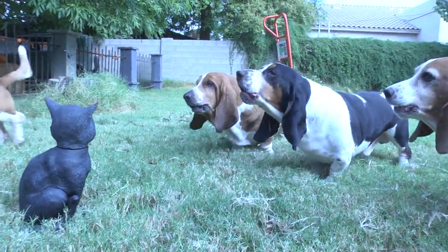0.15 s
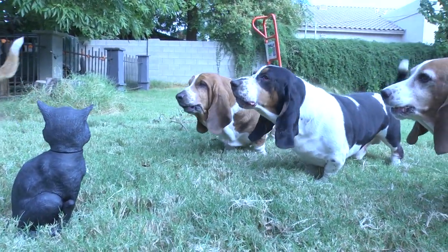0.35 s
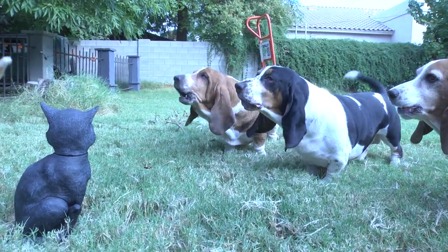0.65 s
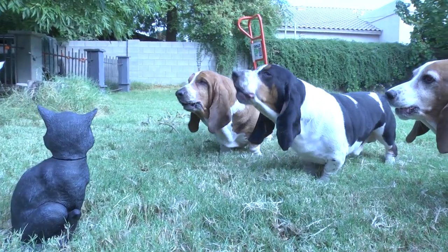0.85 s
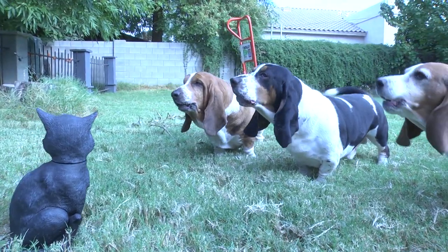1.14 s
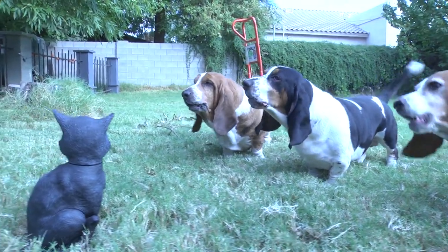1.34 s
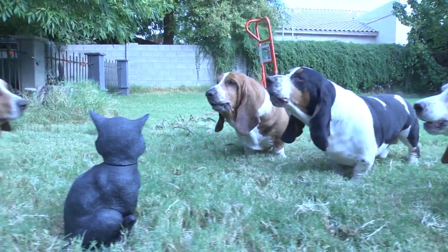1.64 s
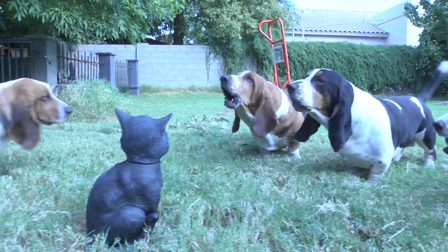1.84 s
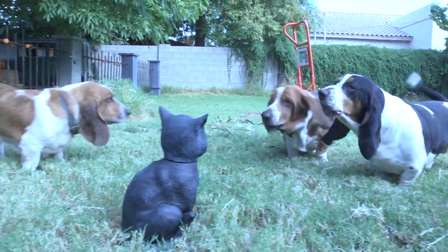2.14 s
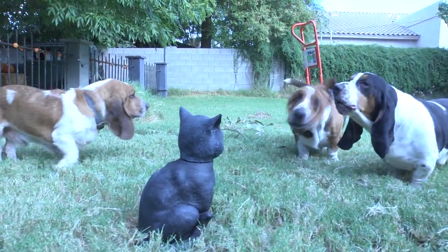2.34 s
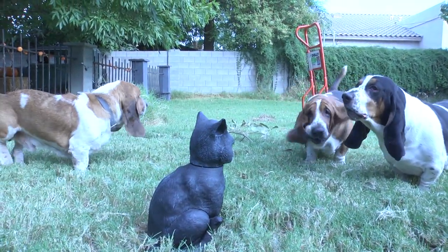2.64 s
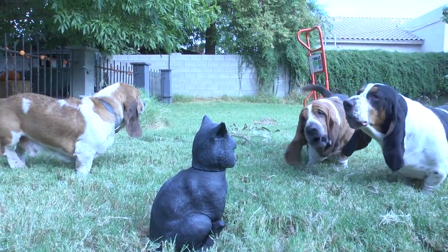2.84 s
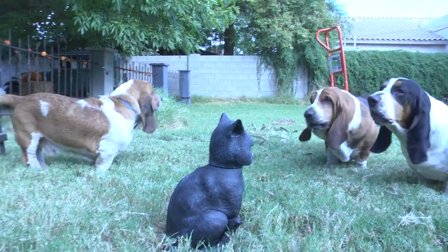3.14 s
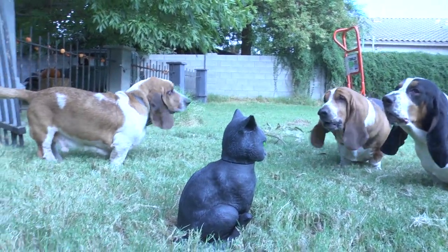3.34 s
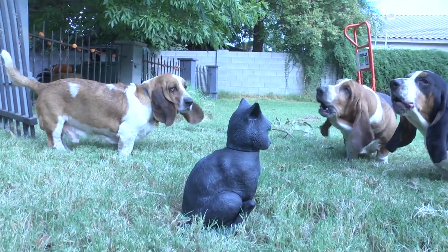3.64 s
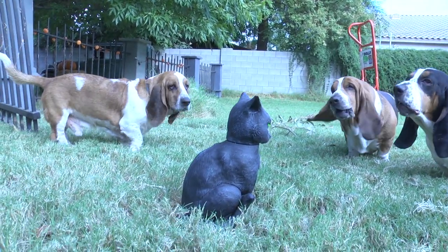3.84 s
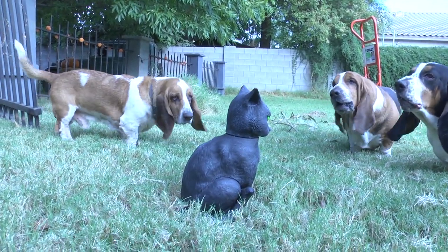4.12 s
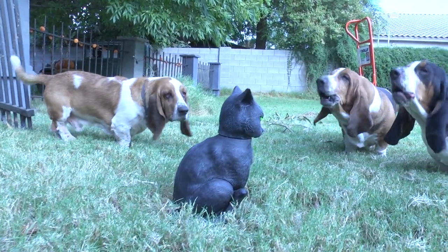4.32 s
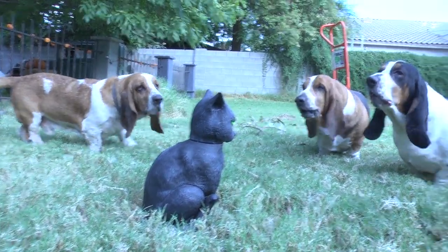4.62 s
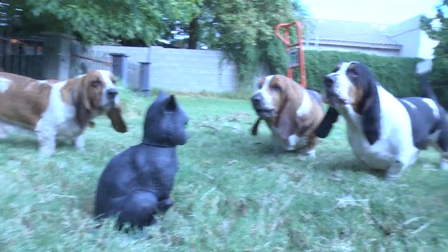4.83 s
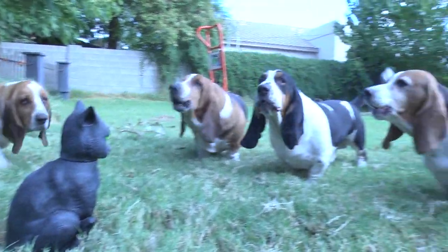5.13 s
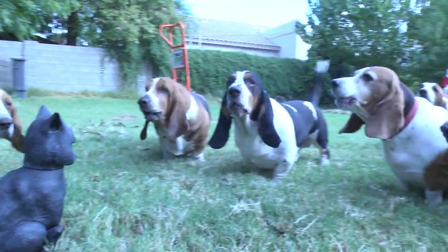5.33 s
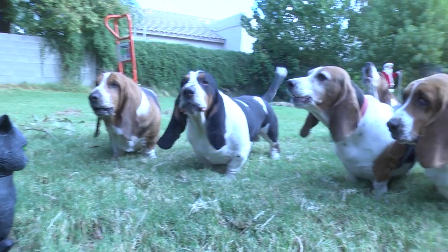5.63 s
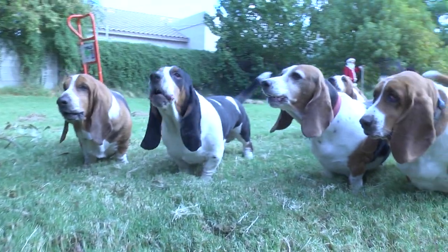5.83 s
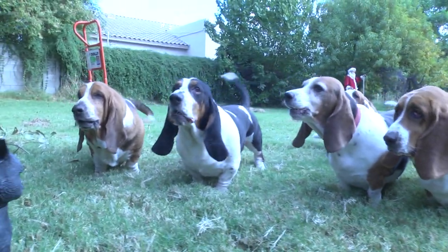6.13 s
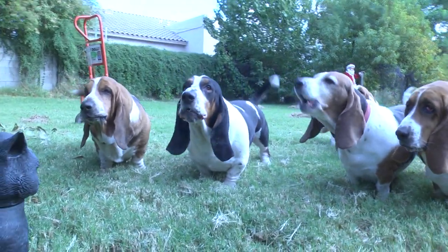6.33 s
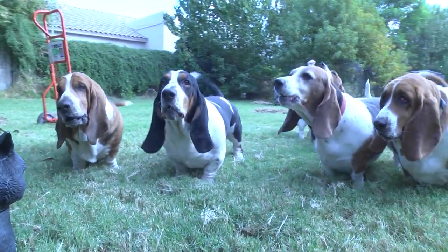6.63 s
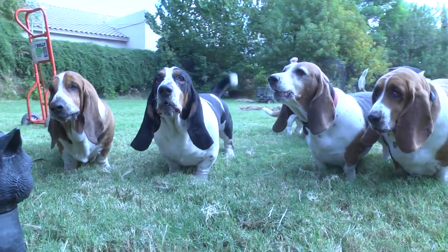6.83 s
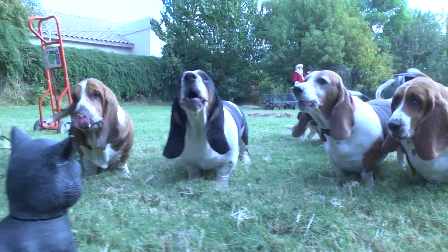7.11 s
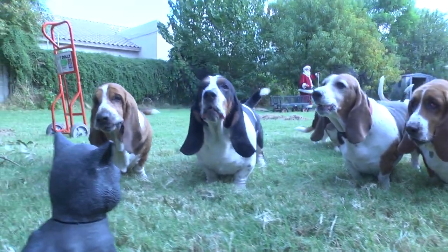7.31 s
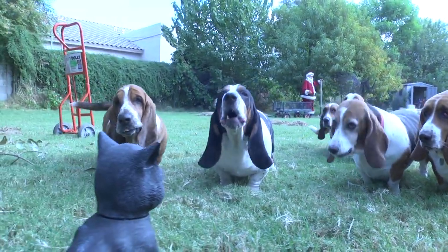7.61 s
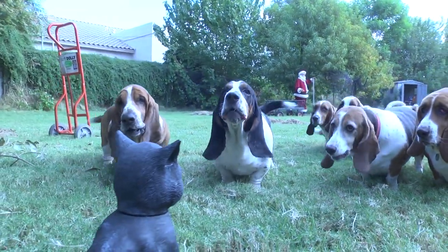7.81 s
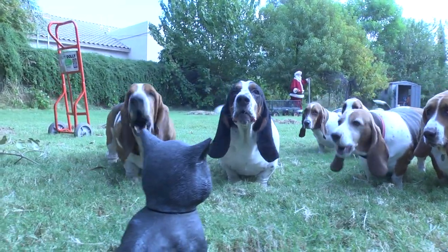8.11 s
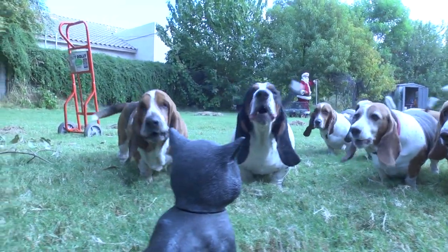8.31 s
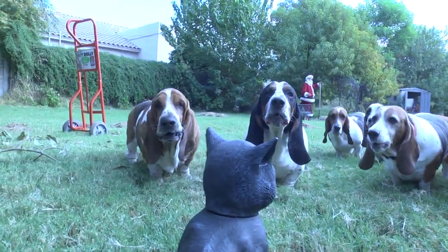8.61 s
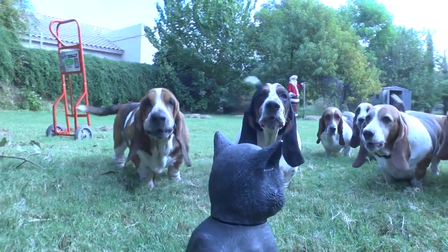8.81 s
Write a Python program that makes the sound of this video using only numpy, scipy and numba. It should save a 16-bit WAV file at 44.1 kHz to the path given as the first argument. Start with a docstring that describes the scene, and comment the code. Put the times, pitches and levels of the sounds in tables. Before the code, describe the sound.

Four basset hounds stand close to the microphone on a lawn, barking and baying without a real pause. A deep woof starts it, a ringing bay and a longer hoarse nasal bay follow, then a harsh rasping bark joins. Calls come three or four per second, often overlapping, each cracking and dropping abruptly. Tiny whines and low growls hide between them; faint outdoor air and light echo lie beneath.

```python
"""A deep woof, then a ringing bay and a hoarse bay: four basset hounds call over one another on a lawn.
A harsh bark joins in; thin whines, low growls and bursts of noise slip in between, over faint outdoor air.
Barks and bays are arches of pitch: harmonics of the vocal folds crack into half-tones and rasp, then sink
to a grunt. Each dog has its own throat filter and moving mouth resonance; walls and hedges echo faintly."""
import sys
import numpy as np
from scipy import signal
from scipy.fft import rfft, irfft
from scipy.io import wavfile
from scipy.ndimage import uniform_filter1d, map_coordinates
from numba import njit

SR = 44100
rng = np.random.default_rng(int(sys.argv[2]) if len(sys.argv) > 2 else 0)


def bounce(signal):
    """Save signal as a 16-bit WAV file at the path given by the first command-line argument."""
    frames = np.transpose(np.atleast_2d(signal))
    limited = np.clip(frames, -1, 1)
    pcm = np.round(limited * 32767).astype(np.int16)
    wavfile.write(sys.argv[1], SR, pcm)


N = 395136
TOP_HZ = 15500  # limit of fold harmonics and of the final low-pass

# Calls, clear ringing bay: [full voice t/s, attack/s, hold/s, tail/s, top target f/Hz, settled target f/Hz,
# level/dB, treble offset/dB, roughness/1, crack delay/s, crack roughness/1]; roughness is clipped to 0-1
CLEAR_CALLS = [ (0.132, 0.045, 0.16, 0.17, 513, 507.4, -12.5, 0, 0.16, 0.14, 0.88),
               (0.865, 0.045, .15, 0.058, 499.6, 502.4, -13, 0.5, 0.12, 0.12, 1.1),
               (2.257, 0.041, 0.16, .16, 506, 510, -13, 1.5, 0.16, .11, 1.11),
               (2.92, 0.058, 0.15, 0.059, 504.7, 512.6, -12, 0, 0.2, 0.11, 1.11),
               (3.195, 0.044, 0.065, 0.037, 381.6, 350, -26.5, 0, 0.15, .05, 0.23),
               (4.36, 0.064, .14, 0.068, 495.3, 527, -16.5, 3.5, 0.2, 0.099, 0.9),
               (5.768, .06, .146, .08, 511.7, 547, -13.5, 0, 0.36, 0.13, 0.82),
               (7.075, 0.066, 0.15, .09, 506, 547.6, -12, 1, 0.18, 0.11, .85),
               (7.66, 0.041, 0.16, 0.18, 505.2, 524.7, -12.5, 0.5, 0.23, 0.12, 1.06),
               (8.342, 0.049, 0.14, 0.13, 502, 526, -13, 2, 0.13, 0.13, 0.71), ]
# Its throat and muzzle response: [f/Hz, level/dB]
CLEAR_THROAT = [(120, 9), (500, 4.5), (780, 2.5), (1050, -7), (1550, -13.5), (2050, -19), (2700, -34.5),
                (3250, -26), (4100, -59.5), (5200, -35.5), (6100, -37.5), (7000, -49), (15000, -69.5)]


def clear_bay():
    """Ringing bay: steady folds, low rasp, strong half-tones in the crack."""
    arch_habit = dict(swoop_s=0.016, top_s=0.04, settle_s=0.08, drop_after_s=0.0069, drop_s=0.013)
    push_habit = dict(droop_db_per_s=17.5, release_db_per_s=450.5, grunt_db=-30.5)
    calls = barks(CLEAR_CALLS, arch_habit, crack_s=0.031, **push_habit)
    return voice_all(calls, CLEAR_THROAT, jitter=0.014, jitter_rate_hz=200, halftone_gain=1.1,
                     rasp_gain_db=-2.5, hoarse=0, closing_treble_db=-1.0,
                     mouth_hz=(770, 1500), mouth_gain_db=3)


# Calls, long hoarse nasal bay: [columns as CLEAR_CALLS]
HOARSE_CALLS = [ (0.345, 0.051, 0.14, 0.2, 500, 364.7, -14, -0.5, 0.43, 0.16, 0.95),
                (0.745, .055, .13, .12, 485, 365, -15, 1.5, 0.39, 0.12, 0.7),
                (1.715, 0.052, 0.093, 0.11, 498.5, 391, -13, 0.47, 0.38, 0.099, 0.66),
                (2.735, 0.051, 0.093, 0.12, 503.5, 373, -13, -2.5, 0.26, 0.092, 0.63),
                (3.848, .045, 0.14, .12, 510.3, 378, -13.5, -0.53, 0.31, 0.015, 0.56),
                (4.74, 0.059, 0.12, .15, 502.6, 365.4, -16, 1.7, 0.24, .14, 0.72),
                (5.615, 0.055, .15, .05, 533.5, 401.3, -13, 1.3, .6, 0.16, 0.77),
                (6.603, 0.058, 0.13, .15, 515, 388.3, -12.5, 0.29, 0.38, 0.17, 0.87),
                (7.445, 0.066, 0.12, 0.15, 510.5, 410.6, -12, 1.4, 0.32, 0.15, 0.74), ]
# Its throat and muzzle response: [f/Hz, level/dB]
HOARSE_THROAT = [(120, -8), (480, 0), (620, -8.5), (880, -3.5), (1220, -24), (1700, -15.5), (2150, -31.5),
                 (2600, -29.5), (2950, -40.5), (4500, -60), (6300, -39), (6900, -58), (8500, -53.5),
                 (12000, -81.5)]


def hoarse_bay():
    """Hoarse bay: turbulence replaces part of the upper harmonics; pitch drops late and slowly."""
    arch_habit = dict(swoop_s=0.017, top_s=0.055, settle_s=0.087, drop_after_s=0.19, drop_s=0.035)
    push_habit = dict(droop_db_per_s=19.5, release_db_per_s=134.5, grunt_db=-45)
    calls = barks(HOARSE_CALLS, arch_habit, crack_s=0.045, **push_habit)
    return voice_all(calls, HOARSE_THROAT, jitter=0.045, jitter_rate_hz=260, halftone_gain=0.23,
                     rasp_gain_db=1.0, hoarse=0.39, closing_treble_db=-1,
                     mouth_hz=(1560, 1700), mouth_gain_db=3)


# Calls, deep woof: [columns as CLEAR_CALLS]
WOOF_CALLS = [ (0.0, .02, 0.077, 0.058, 397.8, 383, -12, -2, 0.13, 0.0036, 0.98),
              (0.622, .018, 0.12, 0.075, 426.7, 379, -13, 2, 0.099, 0.038, 0.73),
              (1.55, 0.045, 0.14, 0.035, 449.5, 418.3, -11.5, 2, 0.33, 0.094, 0.91),
              (1.85, 0.038, .13, 0.068, 421.5, 386, -14, 4, 0.14, 0.024, 0.66),
              (3.612, 0.057, 0.15, .05, 456.4, 386.4, -12, 2, 0.29, 0.054, 0.61),
              (4.295, 0.044, .115, 0.083, 420.2, 398, -13, 5.5, 0.091, .005, 0.75),
              (5.072, 0.021, .143, 0.035, 426, 375, -12, 1, 0.13, 0.046, 0.99),
              (8.727, 0.057, 0.13, 0.12, 437.6, 392, -12.5, 2, 0.14, 0.028, .8), ]
# Its throat and muzzle response: [f/Hz, level/dB]
WOOF_THROAT = [(120, 2), (400, 4), (820, -3.5), (1050, -8.5), (1700, -23.5), (2200, -25), (2700, -39),
               (3200, -33.5), (4300, -49.5), (6200, -44), (7500, -57), (15000, -72.5)]


def deep_woof():
    """Deep woof: lower pitch arch and early crack through a dark throat."""
    arch_habit = dict(swoop_s=0.014, top_s=0.035, settle_s=0.055, drop_after_s=0.03, drop_s=0.011)
    push_habit = dict(droop_db_per_s=13.5, release_db_per_s=477.5, grunt_db=-33)
    calls = barks(WOOF_CALLS, arch_habit, crack_s=0.035, **push_habit)
    return voice_all(calls, WOOF_THROAT, jitter=0.04, jitter_rate_hz=260, halftone_gain=0.25,
                     rasp_gain_db=0.5, hoarse=0, closing_treble_db=-2.0,
                     mouth_hz=(810, 1350), mouth_gain_db=-3)


# Calls, short harsh bark: [columns as CLEAR_CALLS]
HARSH_CALLS = [ (1.072, 0.029, 0.13, 0.047, 561.8, 417.6, -12, -0.31, 0.44, 0.019, 0.94),
               (2.066, 0.034, 0.12, 0.095, 482.3, 409.3, -12.5, -0.21, 0.44, 0.037, 0.65),
               (2.589, 0.027, 0.14, 0.035, 546.7, 417.5, -12, -1, 0.27, .025, 0.99),
               (4.12, 0.042, 0.15, .04, 511.7, 472, -12, 0.59, 0.56, 0.057, 1),
               (4.637, 0.031, 0.14, 0.058, 492.2, 419, -12, 0.68, 0.47, 0.028, 0.9),
               (5.235, 0.037, .105, 0.073, 528.6, 495.3, -13, -1.9, 0.61, 0.083, 0.807),
               (6.352, 0.024, 0.14, 0.054, 573, 452, -11, -0.41, .45, .075, 1),
               (8.122, .028, .16, 0.041, 519.4, 411.6, -11, 0.31, 0.14, 0.038, 0.56), ]
# Its throat and muzzle response: [f/Hz, level/dB]
HARSH_THROAT = [(120, 2), (450, 3), (760, 1.5), (1250, -14), (1550, -14), (2050, -28), (2450, -25),
                (3300, -35.5), (4300, -52.5), (6250, -37), (7500, -58), (15000, -67.5)]


def harsh_bark():
    """Harsh bark: fast pitch swoop, heavy jitter and rasp."""
    arch_habit = dict(swoop_s=0.009, top_s=0.022, settle_s=0.04, drop_after_s=0.031, drop_s=0.014)
    push_habit = dict(droop_db_per_s=22, release_db_per_s=498.5, grunt_db=-36)
    calls = barks(HARSH_CALLS, arch_habit, crack_s=0.04, **push_habit)
    return voice_all(calls, HARSH_THROAT, jitter=0.098, jitter_rate_hz=190, halftone_gain=0.49,
                     rasp_gain_db=0.5, hoarse=0.23, closing_treble_db=-2.5,
                     mouth_hz=(760, 1100), mouth_gain_db=-8)


# Thin whines: [start t/s, length/s, first f/Hz, last f/Hz, mid level/dB, treble offset/dB, roughness/1]
WHINE_CALLS = [(3.17, 0.23, 330.6, 368.7, -37.5, 7, 0.13), (3.385, .25, 423, 582, -38, 9, 0.45),
               (7.23, 0.37, 640, 721, -38.5, -12, 0.2)]
# Whine throat response: [f/Hz, level/dB]
WHINE_THROAT = [(350, -18.5), (680, 1.5), (1550, 9), (2300, -16.5), (3200, -36.5), (9000, -48.5)]


def whines():
    """Thin rising glides of the folds with little jitter and no added half-tones."""
    return voice_all(glides(WHINE_CALLS), WHINE_THROAT, jitter=0.013, jitter_rate_hz=59, halftone_gain=0,
                     rasp_gain_db=5.0, hoarse=0, closing_treble_db=3.0,
                     mouth_hz=(1100, 1500), mouth_gain_db=-27)


# Low growls: [columns as WHINE_CALLS]
GROWL_CALLS = [(1.38, 0.14, 70.4, 64.8, -44.5, 2, 1), (3.1, 0.11, 60, 57.9, -33, 5, 0.36),
               (3.42, 0.28, 68.7, 80.8, -42.5, -8, 0.28), (4.98, .1, 160, 123.6, -29, -2.5, 0.55),
               (8.635, 0.11, 61.4, 70.3, -33.5, 3, .4)]
# Throat response behind a closed jaw: [f/Hz, level/dB]
GROWL_THROAT = [(60, -5), (150, 9.5), (400, 1), (900, -22), (2000, -30), (8000, -57)]


def growls():
    """Low, uneven fold pulses through a throat that passes mostly bass."""
    return voice_all(glides(GROWL_CALLS), GROWL_THROAT, jitter=0.093, jitter_rate_hz=170, halftone_gain=0.3,
                     rasp_gain_db=-7, hoarse=0, closing_treble_db=-4,
                     mouth_hz=(700, 900), mouth_gain_db=-19.5)


# Noise bursts at the hardest push of a bark: [t/s, level/dB]
GUST_TIMES = [(0.647, -26), (5.077, -28), (6.376, -26), (8.139, -24), (8.731, -22)]
# Burst spectrum: [f/Hz, level/dB]
GUST_COLOUR = [(30, -10), (150, 9.5), (1000, 1), (2300, -6.5), (4500, -29.5), (6200, -34), (15000, -73)]


def gusts(width_s=0.021):
    """Voice breaks up briefly: broad noise under Gaussian pulses."""
    t = np.arange(N) / SR
    pulses = sum(undb(db) * np.exp(-0.5 * ((t - peak_s) / width_s) ** 2) for peak_s, db in GUST_TIMES)
    noise = rng.standard_normal(N) * undb(4.8 * wobble(N, 300))
    return pulses * unit(colour(noise, GUST_COLOUR))


def voice_all(calls, throat, **voice):
    """Sum all calls made with one voice setting."""
    return sum(call(*controls, throat, **voice) for controls in calls)


def barks(rows, arch_habit, crack_s, **push_habit):
    """Yield t, f, level, treble, roughness per bark or bay; each call has one Gaussian crack in the voice."""
    slack_rough = 0.45  # slack folds flap unevenly below the settled pitch
    for (start_s, attack_s, hold_s, tail_s, top_hz, settled_hz,
         db, treble_db, rough, crack_delay_s, cracked) in rows:
        t = span(start_s - attack_s, start_s + hold_s + tail_s)
        age_s = t - start_s
        hz = arch(age_s, hold_s, top_hz, settled_hz, **arch_habit)
        level_db = push(age_s, attack_s, hold_s, db, **push_habit)
        crack = np.exp(-((age_s - crack_delay_s) / crack_s) ** 2)
        flap = slack_rough * np.maximum(1 - hz / settled_hz, 0)
        yield t, hz, level_db, treble_db, rough + crack * (cracked - rough) + flap


def arch(age_s, hold_s, top_hz, settled_hz, swoop_s, top_s, settle_s, drop_after_s, drop_s):
    """Pitch/Hz: folds tighten from a grunt to the top, settle, go slack again."""
    grunt_hz, grunt_sag_s, swoop_lead_s = 160.27, 0.3, 0.011
    settling = np.exp(-(np.maximum(age_s - top_s, 0) / settle_s) ** 2)
    tight_hz = settled_hz + (top_hz - settled_hz) * settling
    slack_hz = grunt_hz * np.exp(-np.maximum(age_s - hold_s, 0) / grunt_sag_s)
    swoop = ramp((age_s + swoop_lead_s) / swoop_s)
    drop = ramp((hold_s + drop_after_s - age_s) / drop_s)
    return slack_hz + swoop * drop * (tight_hz - slack_hz)


def push(age_s, attack_s, hold_s, db, droop_db_per_s, release_db_per_s, grunt_db):
    """Level/dB: attack, drooping hold, release onto a fading grunt."""
    attack_db, grunt_fade_db_per_s = 31, 66.5
    over_s = np.maximum(age_s - hold_s, 0)
    level_db = db + attack_db * np.minimum(age_s / attack_s, 0)
    level_db = level_db - droop_db_per_s * np.clip(age_s, 0, hold_s)
    level_db = level_db - release_db_per_s * over_s
    grunt_level_db = grunt_db - grunt_fade_db_per_s * over_s
    return np.where(over_s > 0, np.maximum(level_db, grunt_level_db), level_db)


def glides(rows):
    """Yield the same controls per whine or growl: a slowing glide, loudest in the middle."""
    swell_db = 5.5
    for start_s, length_s, first_hz, last_hz, db, treble_db, rough in rows:
        t = span(start_s, start_s + length_s)
        part = np.linspace(0, 1, len(t))
        hz = last_hz + (first_hz - last_hz) * (1 - part) ** 2
        yield t, hz, db - swell_db * (2 * part - 1) ** 2, treble_db, rough


# Turbulence spectrum at the folds: [f/Hz, level/dB]
RASP_COLOUR = [(40, -32), (180, -15), (290, -23.5), (480, -1.5), (740, 2.5), (12000, 2.5)]
# Dogs come round to face the microphone and brighten: [t/s, treble offset/dB]
FACING = [(4, -2.5), (8, 0)]


def call(t, hz, db, treble_db, rough, throat, jitter, jitter_rate_hz, halftone_gain, rasp_gain_db, hoarse,
         closing_treble_db, mouth_hz, mouth_gain_db):
    """One call: fold harmonics, half-tones and pulsed turbulence through throat and moving mouth."""
    n = len(t)
    rough = np.clip(rough, 0, 1)
    effort = hz / hz.max()

    # roughness staggers the pitch
    stagger = wobble(n, jitter_rate_hz) + 0.598 * wobble(n, 79.97)
    staggered_hz = hz * (1 + jitter * (0.098 + rough) * stagger)
    phase = 2 * np.pi * np.cumsum(staggered_hz) / SR
    buzz = folds(phase, hz, effort)
    # alternating strong and weak cycles: lines between the harmonics
    halftones = buzz * np.cos(phase / 2 + wobble(n, 90.14))
    air = rng.standard_normal(n) * (1 + np.cos(phase)) * undb(1.6 * wobble(n, 159.2))

    # roughness makes the tone stutter; its upper harmonics give way to turbulence
    tone = steady(colour(buzz, throat)) * undb(5.3 * rough * wobble(n, 109.85))
    tone = tone - np.clip(hoarse + 0.32 * rough, 0, 0.9) * treble(tone, 640)
    turbulence = unit(air) + halftone_gain * unit(halftones)
    rasp = unit(colour(colour(turbulence, RASP_COLOUR), throat))
    rasp_gain = undb(rasp_gain_db) * effort * (rough + 0.21 * hoarse)
    voice = np.sqrt(1 - 0.53 * rough ** 2) * tone + rasp_gain * rasp

    # "wow": mouth resonance climbs as the jaw drops, sinks as it shuts
    energy = undb(db) ** 2
    progress = np.cumsum(energy) / np.sum(energy)
    gape = np.interp(progress, [0, 0.3, 0.52, 0.85], [0, 1, 1, 0])
    shut_hz, open_hz = mouth_hz
    centre_hz = shut_hz + gape * (open_hz - shut_hz)
    voice = voice + undb(mouth_gain_db) * resonance(voice, centre_hz, 120.0)

    # upper voice follows push and facing
    push_treble_db = np.interp(progress, [0, 0.35, 0.75], [-1, 3, closing_treble_db])
    bright_db = treble_db + push_treble_db + np.interp(t, *np.transpose(FACING))
    voice = voice + (undb(bright_db) - 1) * treble(voice, 890)
    # shut lips muffle the top, open lips let it out
    muffle_hz, shut_db, open_db = 1230, -1.5, 0.5
    lips_db = shut_db + gape * (open_db - shut_db)
    voice = voice + (undb(lips_db) - 1) * treble(voice, muffle_hz)
    voice = voice + 0.96 * scatter(treble(voice, 2100))

    fade_in_s, fade_out_s, loudest_db = 0.016, 0.024, -10.5
    fade = np.clip(np.minimum((t - t[0]) / fade_in_s, (t[-1] - t) / fade_out_s), 0, 1)
    level_db = np.minimum(db + 1.53 * wobble(n, 73.3), loudest_db)
    sound = steady(voice) * undb(level_db) * fade
    return np.pad(sound, (round(t[0] * SR), N))[:N]


def folds(phase, hz, effort, slack=0.91, count=32):
    """Vocal folds: slack ones have weaker overtones, driven ones clap; overtones flicker."""
    rolloff = slack * (1 - effort) ** 2
    flicker_db = 2.4
    total = 0
    for k in range(1, count + 1):
        flicker = undb(flicker_db * np.log(min(k, 6)) * wobble(len(hz), 31.96))
        total = total + np.cos(k * phase) * (k * hz < TOP_HZ) / k ** rolloff * flicker
    return -total


@njit
def resonance(x, hz, width_hz):
    """State-variable band-pass with moving centre; gain 1 at the centre."""
    y, band, low = np.empty(len(x)), 0., 0.
    for i in range(len(x)):
        g, k = np.tan(np.pi * hz[i] / SR), width_hz / hz[i]
        v = (band + g * (x[i] - low)) / (1 + g * (g + k))
        band, low, y[i] = 2 * v - band, low + 2 * g * v, k * v
    return y


def scatter(x, decay_s=0.0048):
    """Near reflections: gliding harmonics swell and fade across the ripples of a random response."""
    t = np.arange(1024) / SR
    taps = rng.standard_normal(len(t)) * np.exp(-t / decay_s)
    return signal.fftconvolve(x, taps / np.linalg.norm(taps))[:len(x)]


def echo(x, t60_s=0.54, wall_s=0.017):
    """Wall, hedges and trees scatter sound back: decaying noise response with a soft onset."""
    t = np.arange(SR) / SR
    tail = rng.standard_normal(len(t)) * undb(-60 * t / t60_s) * (1 - np.exp(-(t / wall_s) ** 2))
    tail = colour(tail / np.linalg.norm(tail), [(450, -9.5), (3000, 10.5), (10000, 1)])
    return signal.fftconvolve(x, tail)[:N]


# Outdoor air spectrum: [f/Hz, level/dB]
YARD_COLOUR = [(25, -14), (150, -6.5), (600, -22.5), (3000, -25), (4500, -47.5), (15000, -61)]


def yard(db=-56):
    """Faint outdoor air: coloured noise whose level wavers slightly."""
    return undb(db + 0.67 * wobble(N, 13)) * unit(colour(rng.standard_normal(N), YARD_COLOUR))


def undb(db):
    """Convert dB to amplitude gain."""
    return 10 ** (np.asarray(db) / 20)


def unit(x):
    """Scale to rms 1."""
    return x / np.sqrt(np.mean(x ** 2) + 1e-18)


def colour(x, points):
    """Minimum-phase filter through (f/Hz, level/dB) points, built from the cepstrum."""
    size = 4096
    hz, db = np.transpose(points)
    bins_hz = np.fft.rfftfreq(size, 1 / SR)
    gain = undb(np.interp(np.log(bins_hz + 1), np.log(hz), db))
    # fold the cepstrum onto positive time: causal response
    cepstrum = irfft(np.log(gain))
    cepstrum[1:size // 2] *= 2
    cepstrum[size // 2 + 1:] = 0
    response = irfft(np.exp(rfft(cepstrum)))[:size // 2]
    return signal.fftconvolve(x, response)[:len(x)]


def treble(x, hz):
    """Zero-phase high-pass above hz."""
    return signal.sosfiltfilt(signal.butter(2, hz, "high", fs=SR, output="sos"), x)


def wobble(count, rate_hz):
    """Smooth random curve, rms 1, about rate_hz new values per second."""
    place = np.arange(count) * rate_hz / SR
    knots = rng.standard_normal(int(place[-1]) + 2)
    return unit(map_coordinates(knots, [place], order=3, mode="nearest"))


def steady(x, span_s=0.0037):
    """Flatten short-term loudness so that the level curve sets it."""
    count = max(int(span_s * SR), 1)
    power = uniform_filter1d(uniform_filter1d(x ** 2, count), count)
    return x / np.sqrt(np.abs(power) + 1e-9)


def ramp(x):
    """Smooth step from 0 to 1 around x = 0."""
    return 0.5 + 0.5 * np.tanh(x / 2)


def span(first_s, last_s):
    """Sample times/s between two moments, kept inside the scene."""
    return np.arange(max(int(first_s * SR), 0), min(int(last_s * SR), N)) / SR


# Spectrum of the difference between the two microphone ports against their sum: [f/Hz, level/dB]
PORT_DIFFERENCE = [(400, -29.5), (2200, -15), (4000, -2.5), (8000, -4)]


def scene():
    """Pack and yard at two close microphone ports, which agree in the bass and part in the treble."""
    pack = clear_bay() + hoarse_bay() + deep_woof() + harsh_bark()
    pack += whines() + growls() + gusts()
    mid = pack + undb(-19.0) * echo(pack) + yard()
    side = colour(scatter(pack, decay_s=0.0027), PORT_DIFFERENCE)
    side = side + undb(-38.5) * echo(pack) + yard(db=-69.5)
    return np.array([mid + side, mid - side])


def record(dry):
    """Microphone chain: soft peak rounding, 20 Hz high-pass, steep low-pass at TOP_HZ."""
    drive = 0.75
    rounded = np.tanh(drive * dry) / drive
    held = signal.sosfilt(signal.butter(1, 20, "high", fs=SR, output="sos"), rounded)
    return signal.sosfilt(signal.ellip(8, 0.2, 70, TOP_HZ, fs=SR, output="sos"), held)


dry = scene()
out = record(dry)
bounce(out)
```